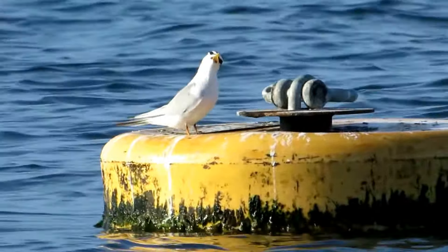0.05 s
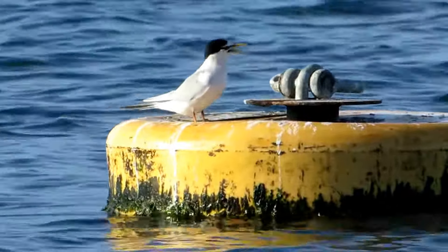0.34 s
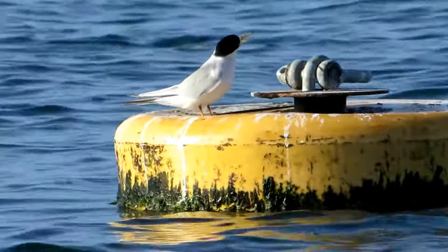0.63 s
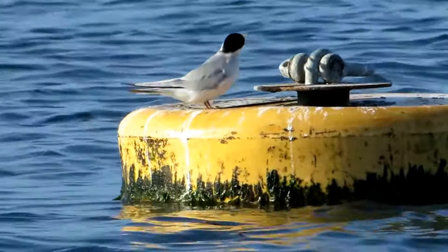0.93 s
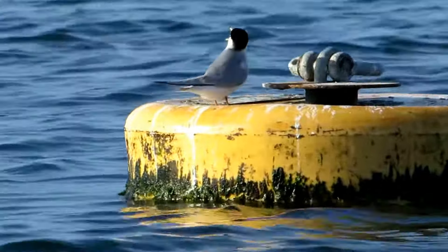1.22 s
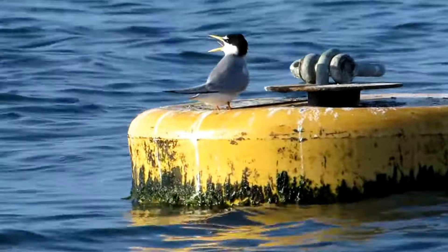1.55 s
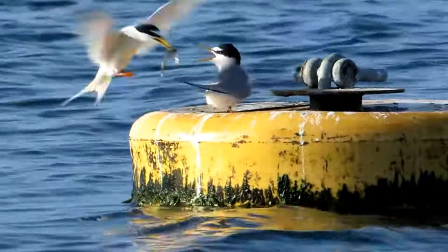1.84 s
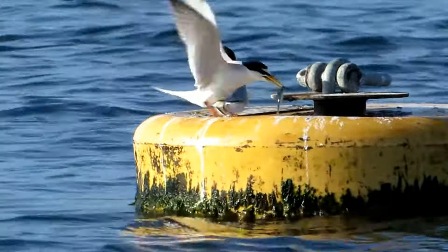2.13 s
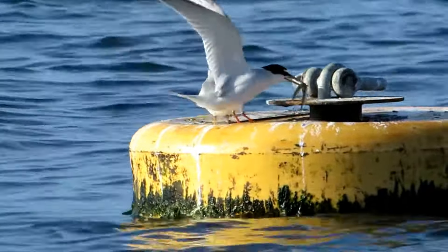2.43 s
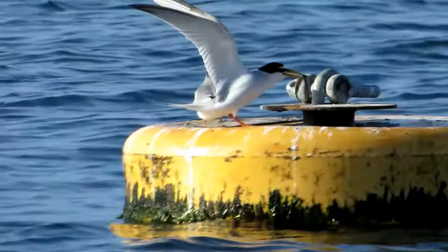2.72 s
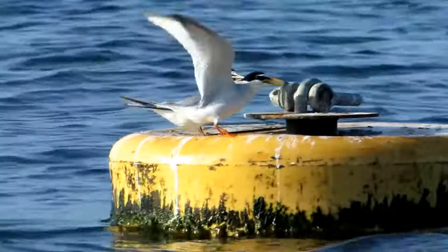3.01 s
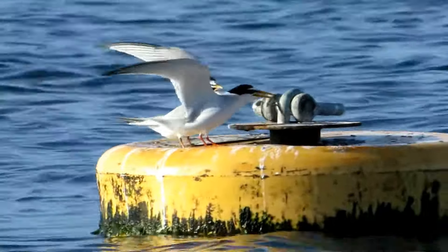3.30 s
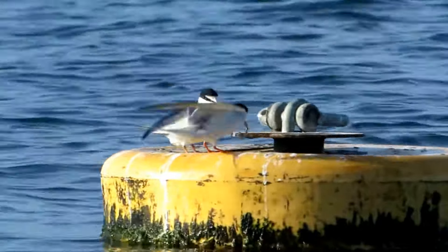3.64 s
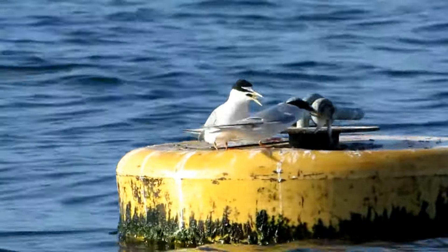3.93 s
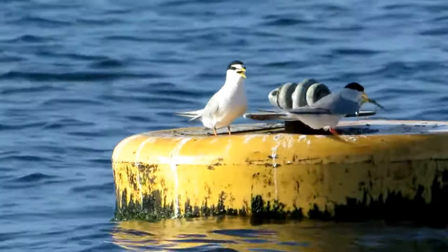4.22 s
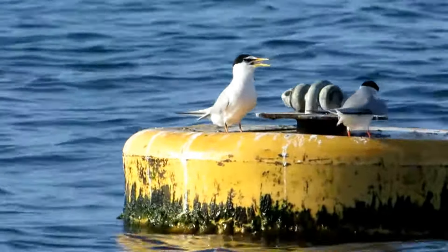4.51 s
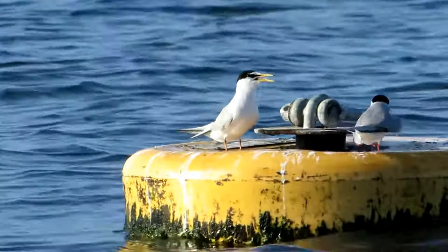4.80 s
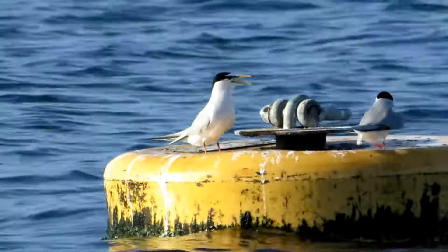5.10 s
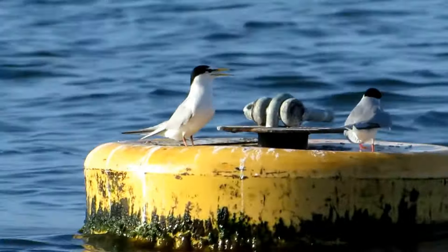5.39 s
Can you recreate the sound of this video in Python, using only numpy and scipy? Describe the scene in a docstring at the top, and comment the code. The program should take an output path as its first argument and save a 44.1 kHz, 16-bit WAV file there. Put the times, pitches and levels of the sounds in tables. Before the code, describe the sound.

Two terns chatter from the start in quick, harsh, squeaky notes mixed with lower clucks. Wind rumbles and flutters on the microphone throughout, above a soft wash of open water. Early on a wave makes one hollow plop, and small dull splashes and ticks come and go. A faint, distant whistle falls twice near the middle, then the chatter continues more softly.

```python
"""Two terns chatter on a buoy from the start, over wind buffeting the microphone and lapping water.
A typical syllable slides up in a low register, breaks into a high squeak and slides down; many are harsh.
Small knocks come and go, and a thin whine returns each second. At 0.7 s a pocket of air trapped by a wave
rings with a hollow plop. Near 2 s and 3 s a faint, far whistle falls; then the chatter grows softer."""
import sys
import numpy as np
from scipy import signal
from scipy.fft import rfft, irfft
from scipy.io import wavfile
from scipy.ndimage import uniform_filter1d

SR = 44100
rng = np.random.default_rng(int(sys.argv[2]) if len(sys.argv) > 2 else 0)


def waveform_to_disk(signal):
    """Save audio, clipped to [-1, 1], as 16-bit WAV at the path in sys.argv[1]."""
    frames = np.transpose(np.atleast_2d(signal))
    scaled = np.clip(frames, -1, 1) * 32767
    samples = np.round(scaled).astype(np.int16)
    wavfile.write(sys.argv[1], SR, samples)


N = 244755
TIME_S, BIN_HZ = np.arange(N) / SR, np.fft.rfftfreq(N, 1 / SR)
BAND_EDGE_HZ = 14600


def gain_of(db):
    """Amplitude grows tenfold every 20 dB."""
    return 10 ** (np.asarray(db) / 20)


def unit_rms(x):
    """Normalisation to a mean power of 1."""
    return x / np.sqrt(np.mean(abs(x) ** 2) + 1e-20)


def spectrum_at(points, hz):
    """Interpolation of a spectrum on a log-frequency axis."""
    point_hz, db = np.transpose(points)
    return np.interp(np.log(hz + 1), np.log(point_hz), db)


def contour(points):
    """Linear interpolation of timed values over the whole scene."""
    return np.interp(TIME_S, *np.transpose(points))


def add(mix, start_s, sound):
    """Superposition: a sound joins the mix at start_s."""
    part = mix[max(round(start_s * SR), 0):][:len(sound)]
    part += sound[:len(part)]


def noise(spectrum):
    """Spectral shaping of white noise, rolling off steeply above the last point; rms 1."""
    colour = gain_of(spectrum_at(spectrum, BIN_HZ)) / (1 + (BIN_HZ / spectrum[-1][0]) ** 2) ** 2
    return unit_rms(irfft(rfft(rng.standard_normal(N)) * colour, N))


def wobble(rate_hz):
    """Low-pass noise: random motion up to about rate_hz; rms 1."""
    low_pass = np.exp(-(BIN_HZ / rate_hz) ** 2 / 2)
    return unit_rms(irfft(rfft(rng.standard_normal(N)) * low_pass, N))


def arch(start_s, end_s, first_hz, middle_hz, last_hz, fade_s):
    """Parabolic glide through three pitches: a note's sample indices, pitch and faded envelope."""
    end_s = max(end_s, start_s + .004)
    at = np.arange(max(int((start_s - fade_s / 2) * SR), 0), min(int((end_s + fade_s / 2) * SR), N))
    u = np.linspace(0, 1, len(at))
    hz = 2 * (u - .5) * ((u - 1) * first_hz + u * last_hz) + 4 * u * (1 - u) * middle_hz
    from_edge_s = np.minimum(u, 1 - u) * len(at) / SR
    return at, hz, np.sin(np.pi / 2 * np.minimum(from_edge_s / fade_s, 1))


# Fizz of a harsh note: frequency_hz, gain_db
FIZZ_SPECTRUM = [(5000, -34), (8500, -7), (12200, 7), (14000, -12)]

def tern_voice(notes, throat, pressure_power, swell, jitter, shimmer, fizz_db, fade_s):
    """Source and filter: the throat shapes partials and breath; roughness modulates them at random."""
    out, waver, shake = np.zeros(N), wobble(380), wobble(830)
    breath, fizz = noise(throat), noise(FIZZ_SPECTRUM)
    flicker = unit_rms(wobble(103) + 1j * wobble(153))
    for start_s, end_s, pitches_hz, level_db, rough, subharmonic_db, second_db in notes:
        at, hz, edges = arch(start_s, end_s, *pitches_hz, fade_s)
        blur, breath_share = rough ** 2, .6 * rough ** 2
        phase = 2 * np.pi * np.cumsum(hz * (1 + (.0042 + jitter * rough) * waver[at])) / SR
        tone = np.zeros(len(at))
        # Period doubling: strong and weak cycles alternate, putting lines between the harmonics.
        for k in np.arange(1, 25) / 2:
            db = spectrum_at(throat, k * hz) + subharmonic_db * (k % 1 > 0) + second_db * (k == 2)
            unsteady = np.sqrt(1 - blur) + np.sqrt(blur) * flicker[(at + rng.integers(N)) % N]
            partial = (unsteady * np.exp(1j * (k * phase + k * k))).real
            tone += gain_of(db) * (k * hz < BAND_EDGE_HZ) * partial
        tone *= 1 + 1.17 * rough * np.cos(.38 * phase)  # a second vibration beats against the voice
        voice = np.sqrt(1 - breath_share) * unit_rms(tone) + np.sqrt(breath_share) * breath[at]
        voice += gain_of(fizz_db) * rough ** 2 * fizz[at]
        # More air pressure raises pitch and loudness together.
        pressure = (hz / hz.max()) ** pressure_power * (1 + swell * np.hanning(len(at))) * edges
        tremor = 1 + np.tanh(shimmer * rough * shake[at])
        out[at] += gain_of(level_db) * unit_rms(voice * pressure * tremor)
    return out


# High-register notes: start_s, length_s, pitch_hz, level_db, roughness, subharmonic_db, closing_slide_s
SQUEAKS = [(0.085, .027, 1900, -29.5, 0.47, 5.5, .028), (.174, 0.046, 1976, -31.5, 0.71, 4.5, 0.0025),
           (0.217, 0.023, 1930, -35.5, 0.46, 1, 0.0024), (0.361, 0.025, 1997, -36, 0.4, -1, .036),
           (0.488, 0.02, 1784, -36.5, 0.17, -15, 0), (0.52, 0.023, 1776, -36, 0.34, -2, 0.00098),
           (0.538, 0.02, 1970, -34, 0.44, -1, 0.00061), (.592, 0.03, 1947, -33, 0.44, -0.5, 0),
           (0.7, 0.041, 2006, -37, 0.53, 3, 0.03), (0.879, 0.023, 2059, -35.5, 0.22, -1, .036),
           (0.95, 0.018, 1953, -38, 0.4, -18, 0.00078), (0.997, 0.011, 1840, -38.5, 0.4, -15, 0),
           (1.005, 0.015, 2364, -38.5, 0.4, -17, 0.0013), (1.013, 0.025, 1685, -41, .17, -11, 0.0012),
           (1.053, 0.027, 2040, -36, 0.41, 2, 0.0012), (1.222, 0.027, 2120, -39, 0.14, -1, 0.015),
           (1.287, 0.018, 1986, -40, 0.24, 0, 0.00033), (1.386, .017, 1857, -33.5, .3, -4, 0),
           (1.4, 0.016, 2130, -37.5, 0.34, -12, 0.033), (1.46, 0.021, 2038, -39.5, 0.4, 4, 0.0088),
           (1.493, .02, 1970, -39.5, 0.07, 2, 0), (1.56, 0.03, 2150, -38, 0.28, -8, 0.017),
           (1.628, .018, 2087, -41, .18, -3, 0), (1.73, 0.024, 2144, -40, 0.14, -6, .02),
           (1.78, 0.011, 1830, -36.5, .24, -6, 0), (1.79, 0.019, 2270, -36, 0.56, -9, 0),
           (1.855, 0.037, 1884, -39, 0.54, -12, 0), (1.883, 0.039, 1977, -36, .55, 0, .025),
           (2.061, 0.037, 2090, -43, 0.17, 0, 0.016), (2.129, 0.018, 2164, -39.5, 0.15, -5, 0.00035),
           (2.235, 0.031, 2160, -36.5, 0.1, -9, 0.019), (2.305, 0.02, 2123, -37, 0, -4, 0),
           (2.414, 0.028, 2146, -35.5, 0.03, -12, 0.02), (2.483, 0.02, 2102, -38.5, 0.17, -12, 0.0023),
           (2.589, 0.032, 2108, -32, 0.16, -5.5, 0.026), (2.637, 0.021, 1760, -32, 0.27, -3, 0),
           (2.647, 0.033, 2077, -34, 0.52, -6, 0), (2.676, 0.028, 1712, -29, 0.14, -22, 0.00014),
           (2.711, 0.016, 1687, -31, 0.16, -15, 0), (2.765, 0.031, 2021, -31.5, 0.2, -3.5, .02),
           (2.835, 0.025, 1950, -39, 0.14, 1, .01), (2.877, 0.032, 1985, -37, 0.1, -1, 0.0016),
           (2.948, 0.026, 2007, -39, .1, 1, 0.0021), (2.983, 0.016, 1978, -37.5, .4, -5, 0.0004),
           (3.008, 0.024, 2013, -40.5, 0.55, -5, 0), (3.122, .026, 2054, -37, 0, -12, 0.021),
           (3.188, 0.018, 2036, -39, 0.05, -8, 0.0004), (3.298, 0.026, 2052, -34.5, 0.17, -6.5, 0.032),
           (3.367, 0.016, 2016, -36.5, 0.16, -4, .022), (3.419, 0.0167, 1825, -35, 0.24, -17, 0),
           (3.43, .013, 2272, -37.5, 0.32, -22, 0.0017), (3.438, 0.02, 1635, -38, 0.16, -14, 0.00096),
           (3.475, 0.024, 2014, -33, 0.2, -4.5, 0.00064), (3.495, 0.04, 1973, -35, .4, -3, 0),
           (3.541, 0.027, 1843, -43, 0.5, -7, 0.00029), (3.646, 0.027, 2094, -36, 0.22, 0.5, 0.028),
           (3.716, 0.014, 2108, -39, 0.28, 2, 0.0018), (3.821, .029, 2090, -42, 0.06, 2, .034),
           (4.008, 0.031, 2010, -42.5, 0.04, -2, .024), (4.079, 0.017, 1930, -44.5, 0.3, -3, 0),
           (4.2, 0.022, 1990, -40, 0.65, 7, .032), (4.478, 0.02, 1840, -42.5, 0.36, -22, .031),
           (4.68, 0.021, 1865, -42, .2, 0, 0.0016), (4.704, 0.014, 1834, -39.5, .3, -21, 0),
           (4.715, .016, 2260, -44, 0.35, -14, 0.003), (4.752, 0.025, 1716, -39.5, 0.16, -9, 0.0025),
           (4.783, 0.024, 1718, -41, 0.17, -6, 0.00096), (4.907, 0.025, 1838, -40, 0.51, 3, 0.0011),
           (4.94, .025, 2023, -40, 0.15, -1, 0.00063), (4.973, .037, 1644, -47.5, 0.54, 11, 0),
           (5.169, 0.013, 1826, -42.5, 0.65, 0, 0.04), (5.397, 0.02, 1830, -42.5, 0.41, 4, 0.05),
           (5.463, 0.043, 1760, -44.5, 0.31, -21, 0), (5.466, 0.019, 2313, -44, 0.53, -31, 0.00035)]
# Lift of a squeak's second harmonic: frequency_hz, gain_db
SECOND_HARMONIC = [(3400, 17), (3700, 5), (4000, 4), (4300, 1), (4600, -12)]

def squeaks():
    """Register break: the voice jumps to a high note that arches and sags at its end."""
    notes = []
    for start_s, length_s, hz, db, rough, subharmonic_db, _ in SQUEAKS:
        second_db = spectrum_at(SECOND_HARMONIC, 2 * hz)
        pitches_hz = (.97 * hz, hz, .9 * hz)
        notes.append((start_s, start_s + length_s, pitches_hz, db, rough, subharmonic_db, second_db))
    return notes


def slides(full_rise_s=.016, overlap_s=.003, rise_db=-42.5, fall_db=-47):
    """Low-register glides lead into and out of squeaks; both registers overlap at the break."""
    rise_ratios, fall_ratios = np.array([.39, .66, .819]), np.array([.71, .535, .46])
    _, _, mean_hz, mean_db, *_ = np.mean(SQUEAKS, axis=0)
    notes, free_from_s = [], 0
    for start_s, length_s, hz, db, squeak_rough, _, fall_s in SQUEAKS:
        end_s = start_s + length_s
        rise_s = min(full_rise_s, start_s - free_from_s)
        effort_db = .55 * (db - mean_db) + .012 * (hz - mean_hz)  # stronger by loud, high squeaks
        rough = .19 + .46 * squeak_rough
        if rise_s > overlap_s:
            # A short gap leaves time for only part of the climb.
            ratios = rise_ratios[-1] + (rise_ratios - rise_ratios[-1]) * rise_s / full_rise_s
            notes.append((start_s - rise_s, start_s + overlap_s, hz * ratios, rise_db + effort_db, rough))
        if fall_s > overlap_s:
            notes.append((end_s - overlap_s, end_s + fall_s, hz * fall_ratios, fall_db + effort_db, rough))
        free_from_s = max(free_from_s, end_s)
    return notes


# Short low-register notes: start_s, length_s, top_pitch_hz, level_db, roughness
CHUCKS = [(0.045, 0.045, 1178, -46.5, 0.54), (0.137, 0.036, 1272, -38, 0.44),
          (0.245, 0.028, 1556, -37, 0.44), (0.416, .02, 1400, -42, 0.33), (0.435, 0.029, 1192, -37, 0.4),
          (0.559, 0.028, 1314, -38, 0.4), (0.666, 0.026, 1413, -39.5, 0.3), (0.766, 0.029, 1415, -42, 0.47),
          (0.975, .025, 1160, -47.5, 0.3), (1.076, 0.029, 1410, -37.5, 0.5), (1.1, 0.038, 1476, -39.5, 0.6),
          (1.13, 0.017, 1534, -40, 0.3), (1.353, 0.024, 1220, -48.5, 0.25),
          (1.511, 0.026, 1398, -43.5, 0.54), (1.945, .033, 1710, -45.5, 0.3),
          (2.327, 0.022, 1320, -41, 0.28), (2.348, 0.028, 1497, -35.5, 0.16), (2.377, .015, 1404, -35, 0.1),
          (3.532, 0.021, 1520, -38, 0.5), (3.884, 0.027, 1493, -43.5, 0.24),
          (4.257, 0.035, 1344, -45.5, 0.54), (4.288, 0.016, 1490, -45.5, 0.1),
          (4.306, .02, 1583, -44, 0.24), (4.324, .018, 1390, -45, 0.15), (4.531, .04, 1470, -48.5, 0.37),
          (4.821, 0.043, 1302, -47, 0.4), (5.008, 0.018, 1398, -45.5, 0.2), (5.025, .018, 1432, -45.5, 0.6),
          (5.041, 0.028, 1422, -44.5, 0.65), (5.072, 0.017, 1210, -51.5, .05),
          (5.217, 0.036, 1352, -47.5, 0.54), (5.525, 0.025, 1392, -46.5, 0.5)]

def chucks():
    """Pitch inflection within one register: a quick rise and fall with no break."""
    return [(start_s, start_s + length_s, (.82 * hz, hz, .81 * hz), db, rough)
            for start_s, length_s, hz, db, rough in CHUCKS]


# Drawn-out calls: start_s, length_s, first_hz, middle_hz, last_hz, bend_share, level_db, roughness
RISING_CALLS = [(2.178, .087, 940, 1209, 1503, 0.194, -37, 0.1),
                (4.122, 0.075, 883, 1396, 1630, 0.68, -44, .1)]

def rising_calls(soft_db=-6):
    """Upward frequency sweep in two arcs: soft to the middle pitch, then at full strength."""
    notes = []
    for start_s, length_s, first_hz, middle_hz, last_hz, bend, db, rough in RISING_CALLS:
        turn_s = start_s + .55 * length_s
        early_hz = (first_hz, first_hz + bend * (middle_hz - first_hz), middle_hz)
        late_hz = (middle_hz, last_hz - bend * (last_hz - middle_hz), last_hz)
        notes.append((start_s, turn_s, early_hz, db + soft_db, rough))
        notes.append((turn_s, start_s + length_s, late_hz, db, rough))
    return notes


# Throat response in each register: frequency_hz, gain_db
LOW_THROAT = [(600, -20.5), (1450, 0.5), (2600, -5.5), (3300, 4.5), (4500, 5), (5800, -12), (6700, -25),
              (9000, -36.5), (11500, -31), (14000, -41)]
HIGH_THROAT = [(800, -18.5), (2100, -2.5), (2700, -11.5), (3500, 0.5), (4300, 1.5), (5200, -5.5),
               (6700, -29), (9000, -39.5), (11500, -39), (14000, -58)]
# Treble as the beak turns: time_s, gain_db
BEAK_TREBLE = [(.2, 8.5), (1.1, 8.5), (1.901, 3), (2.3, 5), (2.65, -1), (3, 5), (5, 0)]

def tern_chatter(treble_hz=6500):
    """Directivity: calls in both registers are brighter when the beak points at the listener."""
    # The low register has no audible subharmonics and no lift of the second harmonic.
    low_notes = [(*note, -100, 0) for note in slides() + chucks() + rising_calls()]
    birds = tern_voice(low_notes, LOW_THROAT, pressure_power=3.03, swell=.34,
                       jitter=.025, shimmer=.15, fizz_db=-23.5, fade_s=.0027)
    birds += tern_voice(squeaks(), HIGH_THROAT, pressure_power=5.5, swell=.8,
                        jitter=.024, shimmer=.23, fizz_db=-23, fade_s=.002482)
    high_pass = (1 + np.tanh((BIN_HZ - treble_hz) / 900)) / 2
    treble = irfft(rfft(birds) * high_pass, N)
    return birds + treble * (gain_of(contour(BEAK_TREBLE)) - 1)


def water_scatter(sound, t60_s=.1, delay_s=.00052):
    """Diffuse reflection: rippled water returns a short smear, different for each ear."""
    t = np.arange(SR // 4) / SR
    tail = rng.standard_normal((2, len(t))) * gain_of(-60 * t / t60_s) * (t > delay_s)
    return signal.fftconvolve(sound[None], tail / np.linalg.norm(tail[0]), axes=1)[:, :N]


# Gust strength, and the relative shares of large, slow and small, quick eddies: time_s, gain_db
GUSTS = [(0.0, -15), (0.29, -12), (0.73, -19.5), (1.02, -10.6), (1.31, -22), (1.43, -16.5), (1.68, -14),
         (1.74, -18.5), (1.9, -17), (2.24, -25.7), (2.43, -19.5), (2.9, -12.5), (3.14, -16.2), (3.74, -15),
         (4.34, -14.5), (4.44, -13.5), (4.81, -19), (5.55, -15.5)]
DEEP_SHARE = [(0, 1), (2.3, 12), (3.2, -3.5), (4.3, -13)]
FLUTTER_SHARE = [(0, -40), (1.06, -21.5), (2.47, -29.5), (2.85, -16.5), (3.37, -20), (3.86, -10),
                 (4.35, -10.5), (4.8, -16), (5.5, -14.5)]
# Spectra of large, middling and small eddies: frequency_hz, gain_db
DEEP_SPECTRUM = [(12, -33), (55, 12), (200, -12)]
RUMBLE_SPECTRUM = [(30, -28), (65, -2.5), (135, 1), (170, -13.5), (230, -21), (700, -56)]
FLUTTER_SPECTRUM = [(100, -12.5), (165, 1.5), (230, -8), (400, -21.5), (900, -58)]
# Single buffets of small eddies: centre_s, level_db
BUFFETS = [(.42, -16), (1.14, -23.5), (2.79, -20), (2.93, -27), (3.07, -25), (3.779, -23), (4.01, -18),
           (4.169, -23), (4.478, -11.5), (4.59, -17.5), (5.012, -12.5), (5.11, -27.5), (5.48, -42)]

def wind(rumble_db=2, flutter_db=4.5, buffet_half_s=.015, force_limit=.75):
    """Turbulent pressure: eddies push the two microphone ports in opposite directions."""
    gust_db = contour(GUSTS)
    rumble_gain = gain_of(gust_db + rumble_db)
    lumps = unit_rms(gain_of(3 * wobble(34)))
    flutter_gain = gain_of(gust_db + contour(FLUTTER_SHARE) + flutter_db) * lumps
    for centre_s, db in BUFFETS:
        flutter_gain += gain_of(db) * np.exp(-((TIME_S - centre_s) / buffet_half_s) ** 2)
    eddies = noise(RUMBLE_SPECTRUM) + noise(DEEP_SPECTRUM) * gain_of(contour(DEEP_SHARE)) / np.sqrt(2)
    eddies /= np.sqrt(uniform_filter1d(eddies ** 2, size=4000) + .023)  # the gusts set the slow swell
    push = rumble_gain * eddies + flutter_gain * noise(FLUTTER_SPECTRUM)
    force = uniform_filter1d(uniform_filter1d(abs(signal.hilbert(push)), size=300), size=300)
    push /= (1 + (force / force_limit) ** 6) ** (1 / 6)  # soft limiting of the strongest buffets
    in_phase = gain_of(-26) * rumble_gain * noise(RUMBLE_SPECTRUM)
    return np.array([-gain_of(-3) * push, push]) + in_phase


# Modes of the air pocket: frequency_hz, level_db, t60_s, rise_s
BUBBLE_MODES = [(411, 8.5, 0.03, 0.0074), (377.5, -8, 0.089, 0.0054), (485, -20.5, 0.1, 0.009)]

def plop(start_s=.6805):
    """Bubble resonance: a wave traps a pocket of air, which rings briefly."""
    out, t = np.zeros(N), np.arange(SR // 4) / SR
    for hz, db, t60_s, rise_s in BUBBLE_MODES:
        envelope = gain_of(db - 60 * t / t60_s) * (1 - np.exp(-t / rise_s))
        add(out, start_s, -envelope * np.sin(2 * np.pi * hz * t))
    return out


# Dull splashes and sharp ticks: start_s, level_db, centre_hz, width_octaves, t60_s
KNOCKS = [(.038, -38, 610, 0.78, 0.17), (.552, -36.5, 240, 0.56, 0.076), (.868, -35.5, 330, 0.73, 0.048),
          (.92, -52, 5500, .7, 0.0067), (1.569, -38, 464, 0.53, 0.11), (1.722, -33, 772, .68, 0.025),
          (2.12, -34.5, 252, 0.24, 0.13), (2.779, -39, 300, 0.53, .05), (2.93, -38.5, 302, 0.67, 0.042),
          (3.079, -38.5, 377, 0.56, 0.044), (3.78, -34.5, 448, 0.66, 0.019),
          (4.379, -43.5, 1600, 0.87, 0.014), (4.422, -36.5, 6000, 0.32, .005),
          (4.627, -62, 1392, 0.74, 0.013), (5.246, -36, 950, 0.62, .014), (5.283, -48, 2507, 1, .008),
          (5.301, -37, 1600, 0.84, 0.015)]

def knocks(rise_s=.00018):
    """Damped transients: each knock is a band of noise that decays exponentially."""
    out, t = np.zeros(N), np.arange(SR // 5) / SR
    hz = np.fft.rfftfreq(len(t), 1 / SR) + 1
    for start_s, db, centre_hz, octaves, t60_s in KNOCKS:
        band = np.exp(-(np.log2(hz / centre_hz) / octaves) ** 2 / 2)
        burst = unit_rms(irfft(rfft(rng.standard_normal(len(t))) * band, len(t)))
        envelope = gain_of(db - 60 * t / t60_s) * (1 - np.exp(-t / rise_s))
        add(out, start_s, burst * envelope)
    return out


# Wash of the sea: frequency_hz, gain_db
SEA_SPECTRUM = [(300, 1), (530, -1), (780, 6), (1300, -8), (2500, -9), (3400, -12.5), (7000, -17.5),
                (14000, -20)]
# Rise and fall of the wash: time_s, gain_db
SEA_SWELL = [(1.4, 1), (2.8, 2), (4.2, -2.5)]

def sea(level_db=-50.5, correlation=.28):
    """Partial coherence: small waves sum to a wash that sounds wide, as the ears share only part."""
    shared = noise(SEA_SPECTRUM)
    separate = np.array([noise(SEA_SPECTRUM), noise(SEA_SPECTRUM)])
    wash = np.sqrt(correlation) * shared + np.sqrt(1 - correlation) * separate
    return gain_of(level_db + contour(SEA_SWELL)) * wash


# Calls from far over the water: start_s, end_s, first_hz, middle_hz, last_hz, level_db
FAR_WHISTLES = [(2.06, 2.245, 1490, 1229, 983, -51), (3.026, 3.211, 1460, 1290, 1093, -55)]

def far_whistles(overtone_db=-12):
    """Downward frequency sweeps, thin in tone: a fundamental and one weak overtone."""
    out = np.zeros(N)
    for *glide, level_db in FAR_WHISTLES:
        at, hz, edges = arch(*glide, fade_s=.03)
        phase = 2 * np.pi * np.cumsum(hz) / SR
        tone = np.sin(phase) + gain_of(overtone_db) * np.sin(2 * phase)
        out[at] += gain_of(level_db) * edges * unit_rms(tone)
    return out


def whine(start_s=.07, length_s=.2, pitch_hz=11220, level_db=-74, wander_rad=.7):
    """Phase modulation blurs a thin, high tone that switches on once a second."""
    gate = (TIME_S - start_s) % 1 < length_s
    tone = np.sin(2 * np.pi * pitch_hz * TIME_S + wander_rad * wobble(55))
    return gain_of(level_db) * gate * unit_rms(tone)


def scene():
    """A level difference between the ears sets the birds slightly right, amid wind and water."""
    birds = tern_chatter()
    calls = birds * gain_of([[-.9], [.9]]) + gain_of(-9) * water_scatter(birds)
    return calls + wind() + sea() + plop() + knocks() + far_whistles() + whine()


# Narrow dip in the microphone's response: centre_hz, width_hz, gain_db
MICROPHONE_DIP = [(3942, 210, -12)]

def record(dry):
    """Linear filtering: the microphone's narrow dip, then a low-pass at the band edge."""
    response_db = sum(db * np.exp(-(2 * (BIN_HZ - centre_hz) / width_hz) ** 2)
                      for centre_hz, width_hz, db in MICROPHONE_DIP)
    faded = dry * signal.windows.tukey(N, .002)
    heard = irfft(rfft(faded) * gain_of(response_db), N)
    low_pass = signal.firwin(511, BAND_EDGE_HZ, window=("kaiser", 9), fs=SR)
    return signal.oaconvolve(heard, low_pass[None], "same")


dry = scene()
out = record(dry)
waveform_to_disk(out)
```